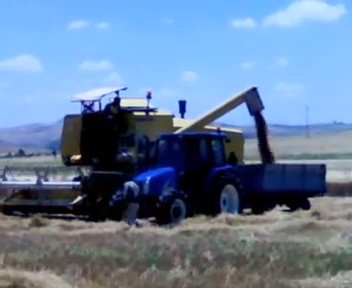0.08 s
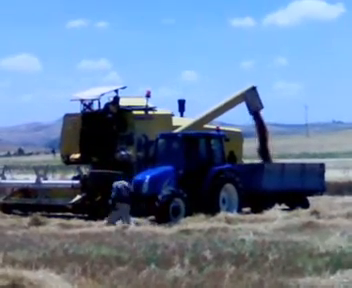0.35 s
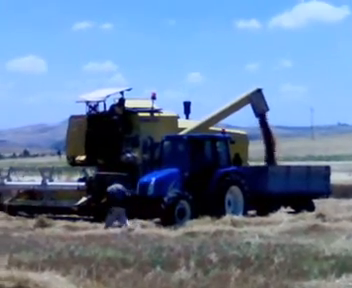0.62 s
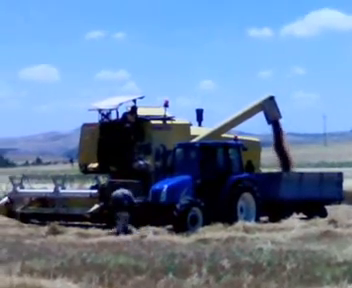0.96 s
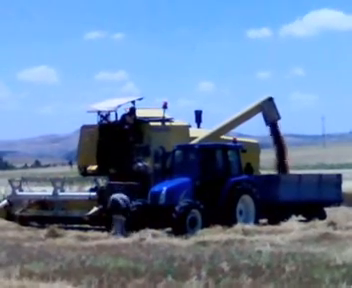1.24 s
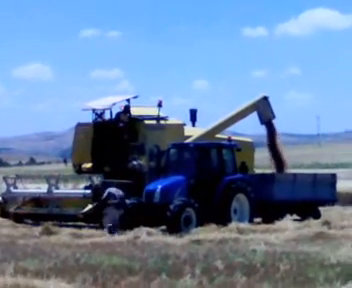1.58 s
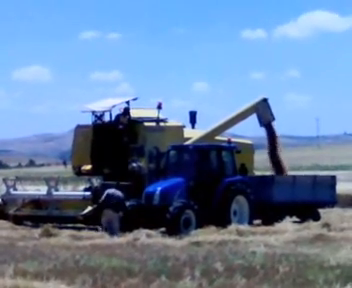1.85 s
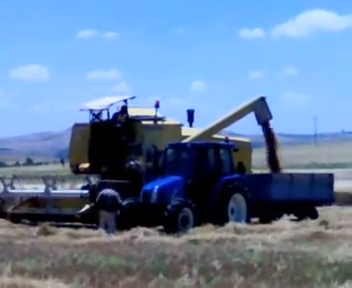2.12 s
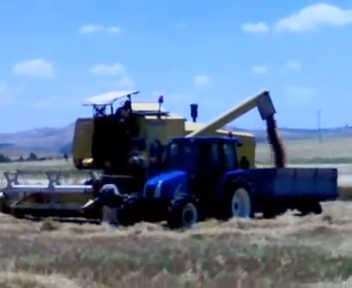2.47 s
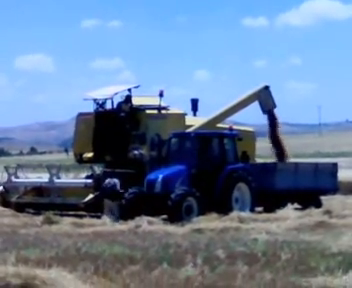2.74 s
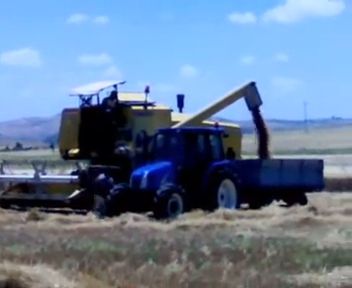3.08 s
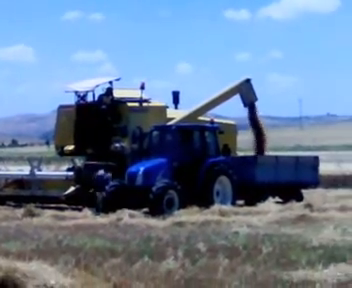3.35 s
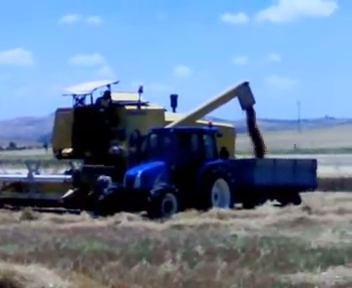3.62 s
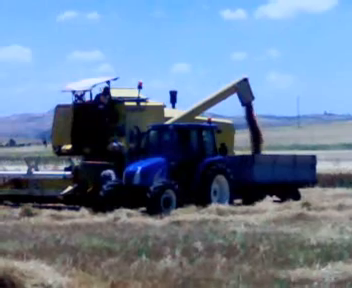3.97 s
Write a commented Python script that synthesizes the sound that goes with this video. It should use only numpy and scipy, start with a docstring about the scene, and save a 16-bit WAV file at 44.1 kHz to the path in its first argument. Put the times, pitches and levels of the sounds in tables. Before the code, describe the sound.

A combine harvester drones far off throughout, with diesel hum, clatter, whine and a faint hiss of pouring grain. A car passes close, its booming exhaust and roaring tyres peaking around 1 second and fading by 2.5. A stone clicks sharply at 0.8 seconds. Wind thumps the microphone at about 1.1, 2.3 and from 3.2 to 3.5 seconds, over the steady machinery.

```python
"""A combine harvester unloading across a field

Far off, a diesel engine hums, machinery clatters, shafts whine and grain hisses into a trailer.
In the first two seconds a car passes close behind the microphone: its exhaust booms, its tyres roar
and sing, and it flicks up a stone. Gusts thump on the bare microphone of a small camera."""
import sys
import numpy as np
from scipy import signal
from scipy.fft import rfft, irfft
from scipy.io import wavfile
from scipy.ndimage import uniform_filter1d, map_coordinates

SR = 44100
rng = np.random.default_rng(int(sys.argv[2]) if len(sys.argv) > 2 else 0)


def transcribe(u):
    """Save the signal u as a 16-bit wav file named by the first command-line argument.

    u: samples, shape (n,) or (channels, n), limited to [-1, 1]; the rate is SR.
    q: integer samples, one column per channel.
    """
    v = np.clip(np.atleast_2d(u).T, -1, 1)
    q = np.round(v * 32767).astype(np.int16)
    wavfile.write(sys.argv[1], SR, q)


N = 176400


def harvester():
    """A diesel hums; the clatter and whine pulse with each firing and each four-stroke cycle."""
    # tones of the hum (multiple of the firing rate, level [dB])
    hum_tones = [(1, 4.5), (2, -29.5), (3, -13.5), (4, -21.5), (5, -31.5)]
    # the hum swells and dips (time [s], change in level [dB])
    hum_swell = [(0, 8.5), (.08, 10.5), (.25, 6), (.47, 8.5), (.59, -3), (.72, 8.5), (.8, 10), (.9, -10),
                 (.99, 5), (1.08, -7), (1.19, 4.5), (1.35, 0), (2.05, 0.5), (2.3, 6), (2.45, -1), (4, -1)]
    # noise of the threshing machinery (frequency [Hz], relative level [dB])
    threshing = [(60, -4.5), (95, 2), (150, -2.5), (230, 0), (300, -2), (360, -9), (560, -5), (750, -6.5),
                 (950, 3), (1100, -11.5), (1250, -12.5), (1650, -3), (2000, -11), (2600, -17)]
    # ringing shafts, sieves and panels (frequency [Hz], width [Hz], relative level [dB])
    ringing = [(469, 41, -1.5), (603, 18, -4.5), (665, 11, 1), (860, 9.8, -6), (964, 13, 0.5),
               (1030, 47, -4), (1194, 11, 2), (1231, 32, -1.5), (1336, 24, -0.5), (1504, 16, 3),
               (1733, 6.8, -1.5), (2256, 18, -13)]
    firing_hz = 58.25
    firings = np.cumsum(firing_hz * (1 + 0.0044 * drift(8))) / SR
    pulsing = 1 + 0.03 * tone(firings) + 0.08 * tone(firings / 4)
    clatter = reflect(noise(threshing)) * undb(-45.5 + 0.42 * drift(8.3))
    whine = undb(-47.5) * resonate(ringing)
    hum = undb(-42.5) * gains(hum_swell)[0] * engine(firings, hum_tones, waver_db=1.5)
    return hum + (clatter + whine) * pulsing


def grain():
    """Grain pours into the trailer with a steady hiss."""
    # the hiss (frequency [Hz], relative level [dB])
    pouring = [(1800, -19), (2600, -1.5), (3400, -0.5), (4500, 3), (5200, 0.5), (6000, -3), (7000, -11),
               (7500, -11)]
    return reflect(noise(pouring)) * undb(-52.5 + 0.49 * drift(30))


def car():
    """Exhaust, body and tyres swell and fade; their pitch drops as the car comes near, then leaves."""
    # exhaust boom (multiple of the firing rate, level [dB])
    exhaust = [(2, -2), (3, -13.5), (5, -4)]
    # six ringing sounds (frequency [Hz], width [Hz], relative level [dB])
    body = [(97, 35, -2), (196, 18, -8.5), (281.3, 38, 1), (344, 62, -0.5)]  # drone of the car's body
    road = [(583, 80, 3.5), (464, 52, -4.5), (647, 200, -11)]  # rumble on the road
    tread = [(787.6, 43, 8), (915, 28, 8), (1039, 43, 8.5), (1157, 63, 6), (1388, 73, 5), (1520, 224, -1),
             (1750, 200, -4.5)]  # roar of the tyre tread
    far_tread = [(1360, 58, 6), (1530, 96, -11.5), (1820, 23, 0), (2030, 49, 7.5), (2450, 71, -2),
                 (2756, 68, -3)]  # high tread note, heard first
    front_tyres = [(1100, 67, 14.5), (1313, 15, 15.5), (1670, 60, -5), (2044, 88, -8.5)]  # sing as they approach
    rear_tyres = [(323, 64, -1.5), (620, 19, 2), (720, 18, 6.5), (1040, 54, -11), (1410, 54, -3.5)]  # sing as they leave
    # two noises of tyres rubbing the road (frequency [Hz], relative level [dB])
    rasp = [(900, -33.5), (1300, 3), (2000, -2), (2600, -5), (3200, -7.5), (4200, -11)]
    hiss = [(2200, -22), (3200, 0), (4400, 4), (5200, 1.5), (6000, -5.5), (7000, -14), (7500, -32)]
    # levels of the low sounds (time [s], exhaust [dB], body [dB], road [dB])
    low_levels = [(0, -41.5, -43.5, -41.5), (0.131, -41.5, -40.5, -42.5), (.44, -33, -34.5, -35.5),
                  (.6, -41, -37.5, -32), (0.769, -42.5, -35, -29), (0.899, -36, -34, -31),
                  (1.041, -39.5, -29, -32.5), (1.351, -54, -37, -34.5), (1.801, -68, -42.5, -44),
                  (2.4, -64, -55, -53.5), (4, -80, -59, -70)]
    # levels of the tyre sounds (time [s], tread [dB], rasp [dB], hiss [dB])
    tyre_levels = [(0, -44.5, -42, -48.5), (.15, -42, -35, -48), (.3, -36.5, -34, -41.5),
                   (0.419, -32, -32.5, -40.5), (.6, -33, -34.5, -44.5), (.78, -29, -37.5, -40.5),
                   (.865, -25.5, -37, -39), (0.9, -24.5, -36.5, -41.5), (1.1, -24, -40.5, -46.5),
                   (1.22, -27.5, -41.5, -45), (1.319, -26, -42.5, -46), (1.371, -30, -43.5, -48),
                   (1.481, -34, -44.5, -49), (1.9, -38, -48, -56.5), (2.079, -42, -50.5, -61),
                   (2.17, -39.5, -50, -62), (2.35, -46, -53, -66.5), (4, -62, -69, -68.5)]
    speed_m_s, closest_s, closest_m, firing_hz = 14, 0.9, 4.5, 55.1
    t = clock()
    distance_m = np.hypot(speed_m_s * (t - closest_s), closest_m)
    sent_s = t - (distance_m - closest_m) / 343  # sound travels 343 metres a second
    firings = np.cumsum(firing_hz * (1 + 0.0071 * drift(8.73))) / SR
    low = [engine(firings, exhaust, waver_db=2), resonate(body), resonate(road)]
    tyres = [resonate(tread), reflect(noise(rasp)), reflect(noise(hiss))]
    songs = [resonate(far_tread), resonate(front_tyres), resonate(rear_tyres)]
    song_gains = [swell(0.25, 0.16, -33.5), swell(0.41, 0.18, -31), swell(1.68, 0.61, -42.5)]
    out = 0
    for part, gain in zip(low + tyres + songs, gains(low_levels) + gains(tyre_levels) + song_gains):
        flutter = undb(drift(34.88))  # about 1 dB
        heard = map_coordinates(part, [sent_s * SR], order=3, mode="mirror")  # bends the pitch
        out = out + gain * flutter * heard
    return out


def whistles():
    """Two hissing whistles flare briefly as the car draws level."""
    # (time [s], half length [s], frequency [Hz], width [Hz], level [dB])
    flares = [(0.661, 0.089, 4450, 261, -42), (0.83, 0.11, 5130, 260, -45.5)]
    return sum(swell(s, half, db) * resonate([(hz, width, 0)]) for s, half, hz, width, db in flares)


def stone():
    """A stone snaps from under a tyre: one sharp click and a ring of about a millisecond."""
    # the stone's ringing tones (frequency [Hz], level [dB])
    stone_tones = [(2400, -26), (4650, -17), (5150, -22), (6100, -21.5)]
    hit_s, contact_s, decay_s = 0.8318, 0.00014, 0.0008
    age = clock() - hit_s
    after = np.maximum(age, 0)
    click = undb(-10.5) * np.exp(-(age / contact_s) ** 2)
    ring = sum(undb(db) * np.sin(2 * np.pi * hz * after) for hz, db in stone_tones)
    return click + ring * np.exp(-after / decay_s)


def wind():
    """Short gusts ride on a light breeze; the hardest swirls of air thump the microphone."""
    # gusts (time [s], half length [s], level [dB])
    gusts = [(0.095, 0.12, -39), (1.141, 0.028, -26.5), (1.251, 0.024, -31), (2.238, 0.064, -35),
             (2.348, 0.031, -29), (2.381, 0.02, -31), (2.575, 0.025, -44), (3.091, .015, -40),
             (3.225, 0.05, -29.5), (3.29, 0.014, -31), (3.44, 0.045, -30)]
    # noise of swirling air (frequency [Hz], relative level [dB])
    swirling = [(20, -3.5), (50, 3.5), (100, 5.5), (180, 1.5), (280, -6), (380, -16.5), (550, -27.5),
                (1000, -75)]
    # thumps (time [s], peak level [dB], width [s])
    hard_swirls = [(1.1204, -6.5, 0.00095), (1.1301, -10.5, 0.0011), (1.1421, -10, 0.0011),
                   (2.3241, -11, 0.0014), (2.347, -14, 0.0018), (3.179, -27, 0.0011), (3.2036, -14, 0.0024),
                   (3.226, -20.5, 0.0012), (3.247, -21, 0.0021), (3.295, -21, 0.0016),
                   (3.354, -23.5, 0.0019), (3.406, -19, 0.002), (3.432, -24, 0.0013), (3.452, -17.5, .001),
                   (3.4753, -13.5, 0.0014)]
    breeze = undb(-49 + 0.78 * drift(17))
    strength = breeze + sum(swell(s, half, db) for s, half, db in gusts)
    thumps = 0
    for s, db, width in hard_swirls:
        age = (clock() - s) / width
        thumps = thumps + undb(db) * (1 - age ** 2) * np.exp(-age ** 2 / 2)  # a push between two dips
    return strength * noise(swirling) + thumps


def rumble():
    """Air moving past the microphone makes a faint, deep rumble."""
    # the rumble (frequency [Hz], relative level [dB])
    moving_air = [(18, -4.5), (30, -1.5), (45, -5.5), (62, -11.5), (80, -9.5)]
    return noise(moving_air) * undb(-42.5 + 1.3 * drift(17))


def engine(firings, harmonics, waver_db):
    """Repeated firings make tones at multiples of their rate; each wavers in level on its own."""
    return sum(undb(db + waver_db * drift(7.5)) * tone(round(multiple) * firings + rng.random())
               for multiple, db in harmonics)


def reflect(x):
    """Add quick echoes off the ground and steel sides, then scale to an average level of 1."""
    # echoes (delay [s], level next to the direct sound [dB])
    echoes = [(.0071, -15), (0.012, -15), (0.017, -23), (0.03, -14.5)]
    t = clock()
    return unit(x + sum(undb(db) * np.interp(t - delay, t, x, period=N / SR) for delay, db in echoes))


def resonate(modes):
    """Random shaking makes a thing ring in narrow bands (frequency [Hz], width [Hz], level [dB])."""
    f = np.arange(N // 2 + 1) * SR / N
    power = sum(undb(db) ** 2 / (1 + ((f - hz) / width * 1.04) ** 2) ** 2 for hz, width, db in modes)
    return unit(irfft(rfft(rng.standard_normal(N)) * np.sqrt(power), N))


def noise(points):
    """Noise shaped by (frequency [Hz], level [dB]) points, fading steeply beyond the first and last."""
    hz, db = np.array(points).T
    octave = np.log2(np.maximum(np.arange(N // 2 + 1) * SR / N, 1))
    octaves_outside = abs(octave - np.clip(octave, np.log2(hz[0]), np.log2(hz[-1])))
    shape = undb(np.interp(octave, np.log2(hz), db) - 90 * octaves_outside)
    return unit(irfft(rfft(rng.standard_normal(N)) * shape, N))


def drift(rate_hz):
    """A smooth random wander, about 1 either side of zero."""
    step = int(SR / rate_hz)
    held = np.repeat(rng.standard_normal(600), step)[:N]
    return 1.4 * uniform_filter1d(uniform_filter1d(held, step), step)


def swell(peak_s, half_s, db):
    """A bell-shaped rise and fall in volume."""
    return undb(db) * np.exp(-((clock() - peak_s) / half_s) ** 2)


def gains(table):
    """One volume curve for each dB column of a table that starts with a time column."""
    times, *columns = np.array(table).T
    return [undb(np.interp(clock(), times, db)) for db in columns]


def tone(cycles):
    """A pure tone of average level 1, from a running count of its cycles."""
    return np.sqrt(2) * np.sin(2 * np.pi * cycles)


def unit(x):
    """Scale to an average level (root mean square) of 1."""
    return x / np.sqrt(np.mean(x ** 2))


def undb(db):
    """Turn decibels into a number to multiply by."""
    return 10 ** (np.asarray(db) / 20)


def clock():
    """The time of every sample in seconds."""
    return np.arange(N) / SR


def scene():
    """All the sounds meet at one microphone."""
    return (harvester() + grain() + car() + whistles() + stone() + wind() + rumble())[None]


def record(dry):
    """The camera cuts the treble steeply and shifts the whole wave by a constant amount."""
    top_hz, offset = 7250, -0.139
    treble_cut = signal.ellip(10, 0.2, 80, top_hz, fs=SR, output="sos")
    return signal.sosfilt(treble_cut, dry) + offset


dry = scene()
out = record(dry)
transcribe(out)
```